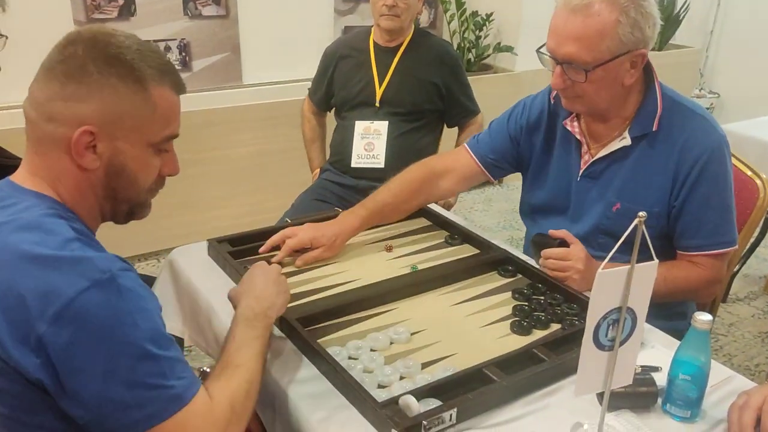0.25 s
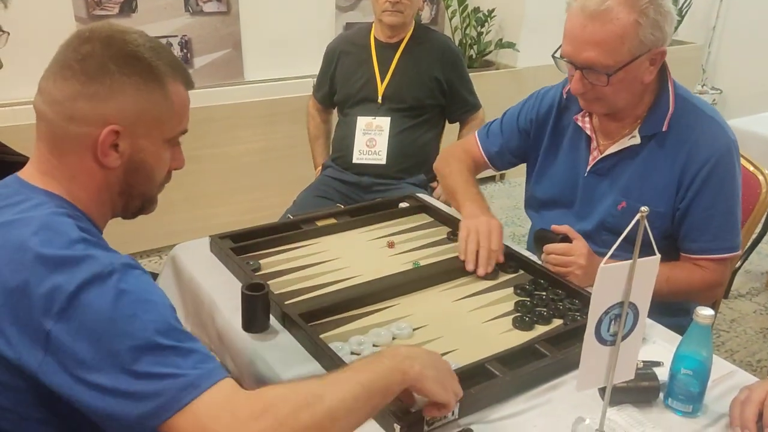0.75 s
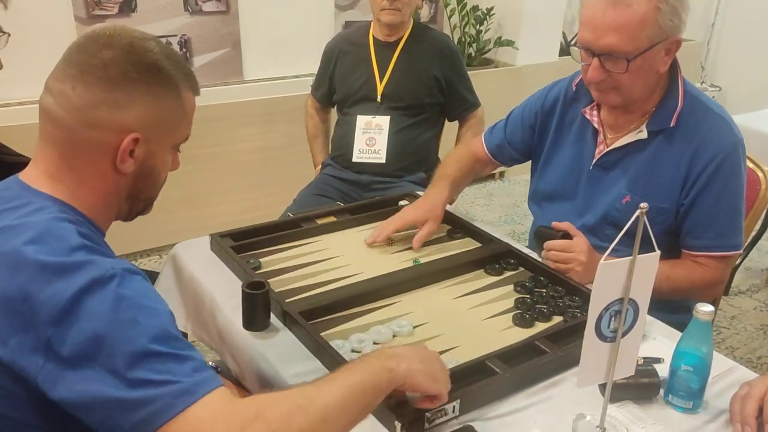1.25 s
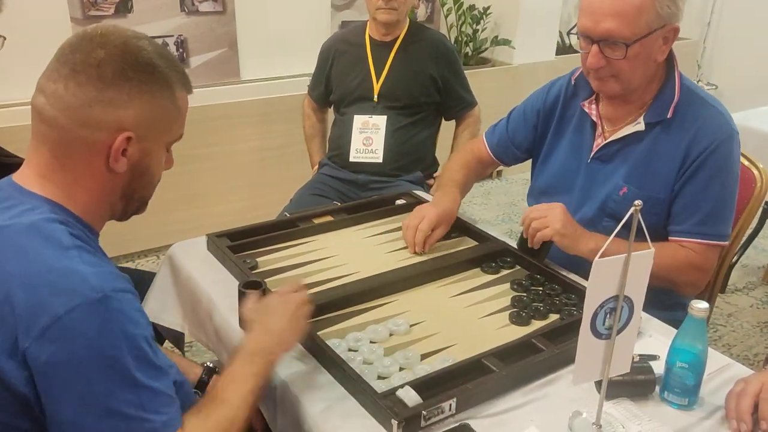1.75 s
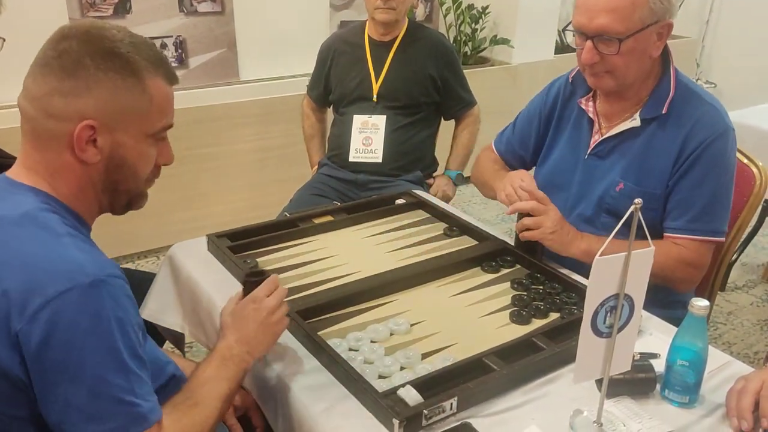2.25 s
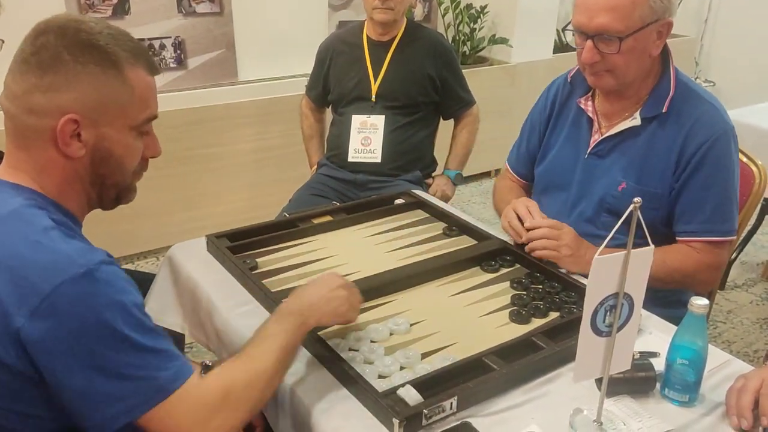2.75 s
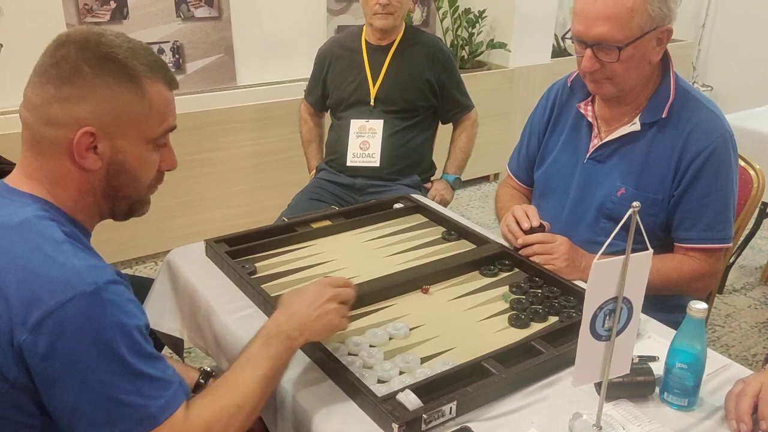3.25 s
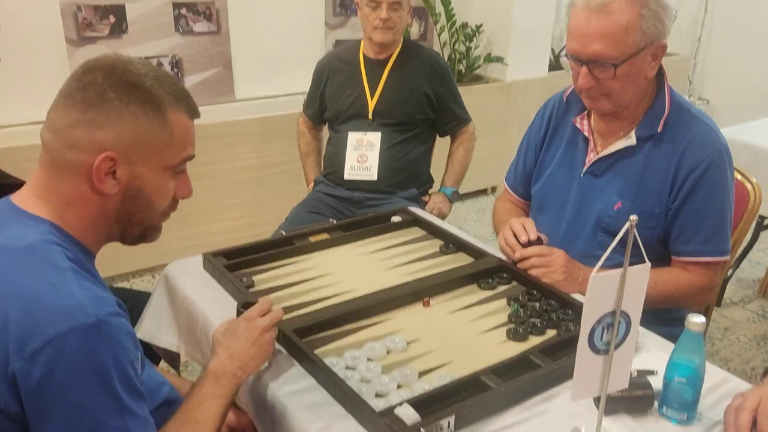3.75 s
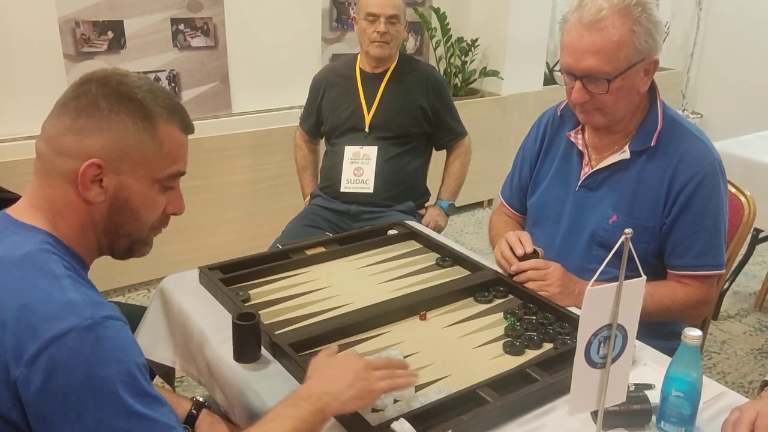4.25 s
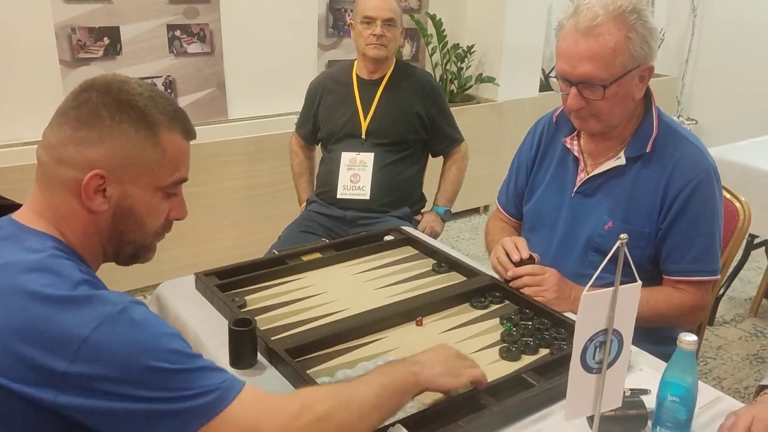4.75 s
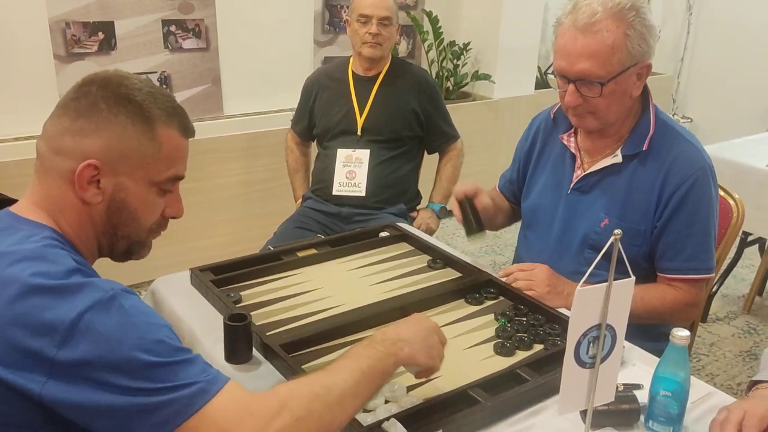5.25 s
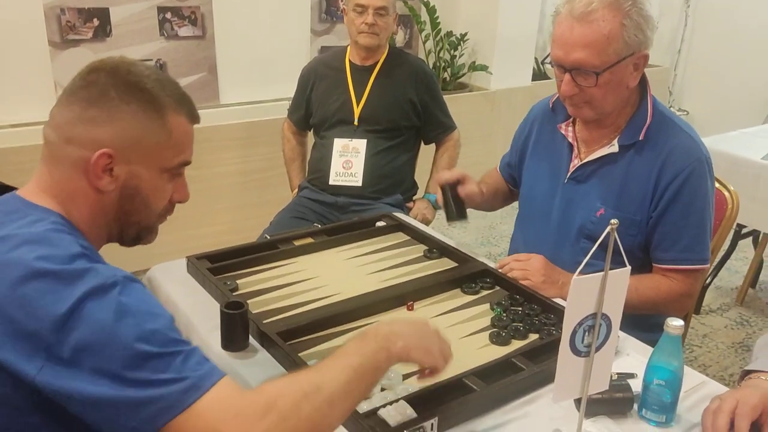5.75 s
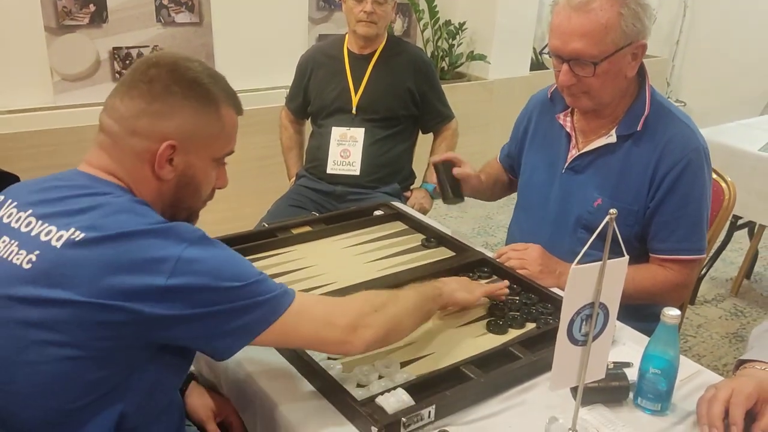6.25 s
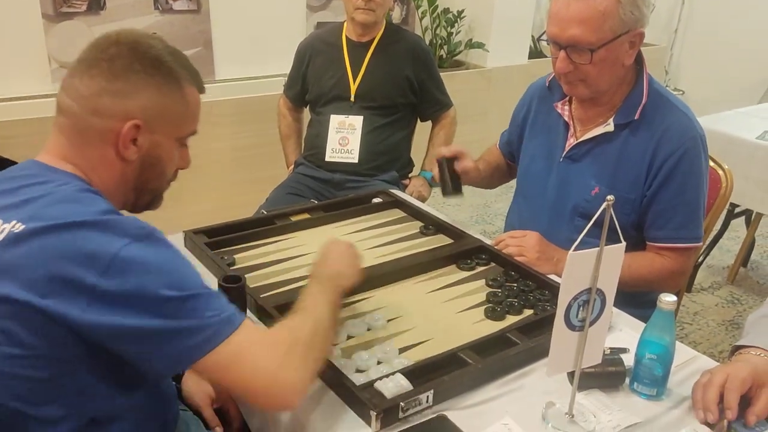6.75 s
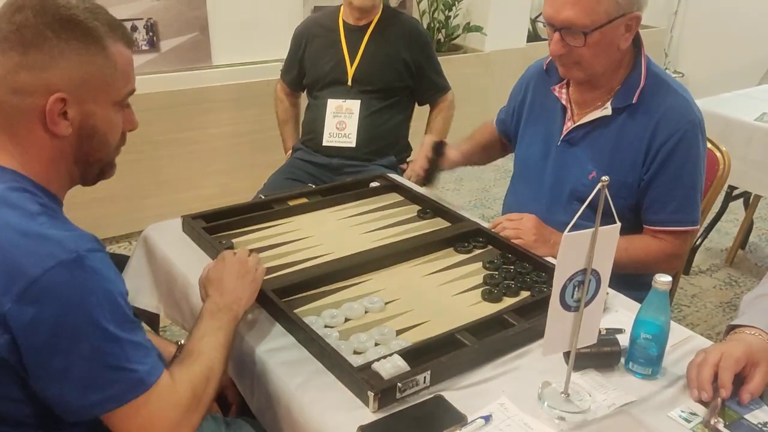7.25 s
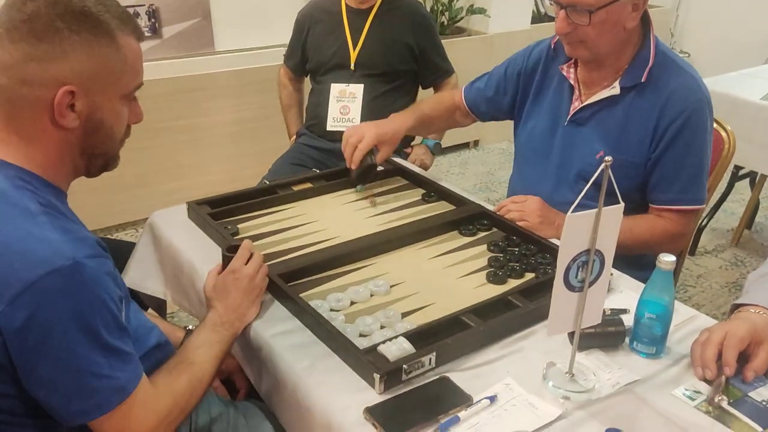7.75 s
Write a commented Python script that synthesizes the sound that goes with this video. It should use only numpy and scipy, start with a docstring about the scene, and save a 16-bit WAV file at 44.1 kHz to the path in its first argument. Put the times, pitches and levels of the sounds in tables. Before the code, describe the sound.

A quiet hall with a low mains hum and soft ventilation, heard in stereo close beside a wooden backgammon board. A very soft wood knock and faint slide open, with tiny dice ticks around 0.4-0.5 s. Checkers clack sharply at 0.9-1.0 s and again near 1.4 s. Dice knock hollowly in a cup at about 1.7 s, returning at 2.5 s with a bright tick. From 2.8 to 4.9 s it is sparse: faint slides, soft thuds and small clicks. Two crisp checker clicks come at 5.1 s, then a hard bright cluster at 5.5-5.7 s as the cup begins to rattle. Shaking is loud and dense from 5.8 to 7.1 s, deep and higher knocks overlapping. Two dry clicks sound left at 7.16 s; light dice ticks, weak cup knocks and muted board thuds trail to 8 s, with a diffuse, gentle echo behind.

```python
"""A soft knock on wood and a faint slide come first, over a low mains hum; then dice tick in a
cup that rings hollow and checkers clack: backgammon in a quiet hall, heard from beside the table.
Solid contacts are short bursts of damped modes plus a noisy crack, and the cup sounds as an air cavity.
Hands and pieces thud on the wooden board or slide with friction noise; ventilation lies beneath.
The knocks are also sent into a diffuse hall echo whose patterns fade into one another."""
import sys
import numpy as np
from scipy import signal
from scipy.fft import rfft, irfft
from scipy.io import wavfile
from scipy.ndimage import uniform_filter1d

SR = 44100
rng = np.random.default_rng(int(sys.argv[2]) if len(sys.argv) > 2 else 0)


def generate_wav(sig):
    """Save sig (samples, or channels by samples) to the path in sys.argv[1] as 16-bit PCM at SR."""
    pcm = np.round(np.clip(np.atleast_2d(sig).T, -1, 1) * 32767).astype(np.int16)
    wavfile.write(sys.argv[1], SR, pcm)


N = 352788

# Dice knocking inside a cup, with a few returns of the knock at 1.66 s; from 5.4 s two shakes
# overlap, a deep one about every .27 s and a higher one every .17 s.
# Each row: start in seconds, level in dB before the gains of each layer,
# pitch in Hz to which the cavity sinks, its t60 in seconds, wall rap in dB relative to the level.
CUP_KNOCKS = [(0.356, -39.5, 1060, 0.017, -4), (.459, -42.5, 1110, 0.021, -13),
              (.527, -49, 1090, .018, -16), (.637, -47, 1080, .016, -14), (1.664, -21, 897, .06, -1.5),
              (1.696, -33, 860, .025, -4), (1.716, -29, 940, .036, -20), (1.736, -34, 884, .028, -14),
              (1.747, -33, 844, 0.022, -18), (1.787, -34, 898, 0.035, -25), (1.82, -39, 870, .024, -15),
              (2.268, -53, 1080, 0.034, -19), (2.319, -40.5, 1080, 0.033, -2.5),
              (2.496, -22, 820, .021, -14), (2.512, -26.5, 837, .022, -18), (2.545, -25, 780, 0.024, -18),
              (2.637, -30, 772, 0.02, -15), (2.648, -41, 815, 0.024, -18), (2.738, -41, 900, 0.011, -11),
              (2.773, -41.5, 870, 0.012, -14), (5.463, -19.5, 724, 0.018, -16),
              (5.476, -18.5, 755, 0.011, -18), (5.71, -22.5, 660, 0.021, -2), (5.716, -23, 750, 0.013, -8),
              (5.73, -27, 714, 0.014, -4), (5.739, -24, 610, 0.023, -20), (5.786, -34, 720, 0.015, -12),
              (5.843, -23, 838, 0.036, -7.5), (5.862, -27, 875, .03, -17), (5.869, -26, 903, .03, -13),
              (5.922, -26.5, 817, .028, -22), (5.971, -16, 670, .019, -13), (5.976, -21, 680, 0.013, -15),
              (5.984, -25, 760, 0.013, -12), (5.993, -25, 704, 0.014, -8), (6.029, -17.5, 817, 0.028, -2),
              (6.036, -18.5, 794, 0.021, -3.5), (6.046, -19.5, 860, .02, -10), (6.061, -25, 830, .02, -10),
              (6.09, -26.5, 840, .02, -14), (6.113, -28, 840, .03, -6), (6.172, -27.5, 680, 0.02, -26),
              (6.196, -21.5, 803, 0.037, -3), (6.213, -23, 854, 0.024, -18), (6.222, -23, 840, .026, -7),
              (6.251, -21.5, 820, 0.014, -9), (6.259, -17, 694, 0.015, -18), (6.283, -30, 830, .02, -14),
              (6.32, -35, 810, .022, -13), (6.365, -22, 810, 0.018, -15), (6.372, -23.5, 940, 0.018, -19),
              (6.378, -21.5, 935, 0.018, -18), (6.39, -26.5, 853, .026, -15),
              (6.397, -25.5, 854, 0.025, -11), (6.494, -22.5, 626, 0.019, -19),
              (6.517, -21, 700, 0.017, -6), (6.521, -21, 654, 0.019, -12), (6.543, -20.5, 840, 0.015, -5),
              (6.551, -15, 824, 0.023, -5), (6.559, -23.5, 873, .018, -6), (6.567, -28, 870, .018, -11),
              (6.584, -25, 845, .017, -10), (6.625, -28, 810, 0.028, -14), (6.648, -30, 820, .02, -13),
              (6.69, -20.5, 750, .018, -14), (6.702, -18.5, 810, 0.018, -4.5), (6.711, -21, 843, 0.023, -9),
              (6.722, -22, 830, 0.029, -10.5), (6.742, -24, 830, 0.023, -15),
              (6.786, -24.5, 734, 0.023, -16), (6.791, -25, 637, 0.028, -17), (6.8, -23.5, 696, 0.013, -12),
              (6.861, -20, 845, 0.024, -14), (6.879, -22, 880, 0.024, -16), (6.888, -27, 850, 0.02, -18),
              (6.901, -23, 840, 0.025, -21), (6.911, -28, 860, 0.02, -16), (6.93, -24.5, 610, 0.021, -26),
              (6.937, -28.5, 814, .018, -18), (6.982, -27, 850, 0.023, -11.5),
              (7.02, -25.5, 866, 0.029, -12), (7.065, -17.5, 787, 0.05, -26),
              (7.087, -26.5, 780, 0.022, -14), (7.131, -29, 794, 0.037, -10), (7.305, -40, 950, .014, -5),
              (7.376, -32, 815, 0.026, -16), (7.39, -35, 830, .022, -12), (7.421, -37.5, 815, 0.025, -9),
              (7.452, -39, 804, .02, -13), (7.511, -37, 780, 0.026, -15), (7.58, -37, 794, 0.028, -17),
              (7.632, -40, 745, 0.019, -9), (7.736, -38, 800, .018, -13), (7.766, -36.5, 820, .02, -20),
              (7.789, -28.5, 820, .018, -22), (7.796, -32.5, 814, 0.016, -20),
              (7.907, -45, 850, 0.019, -10)]
# Modes of a die. Each row: frequency in Hz, relative level in dB, t60 in seconds.
DIE_MODES = [(2240, 3.5, 0.014), (3640, 2.5, 0.0062), (5070, 7.3, 0.0055), (6660, 3.2, 0.0018),
             (8090, 2, 0.015), (8760, 7.5, 0.0064), (10420, 2.5, 0.0095), (12540, 6.9, 0.013)]
# Modes of the cup wall. Each row: frequency in Hz, relative level in dB, t60 in seconds.
CUP_WALL_MODES = [(1300, -5, 0.0092), (1940, -2.5, 0.0086), (2245, -0.5, 0.0094), (2630, -6.5, 0.0054)]


def checkers(lead_db=-6.5):
    """Impact of hard discs: a burst of touches excites rim and bending modes, and chatter repeats it."""
    # Checker set against checker. Each row: start in seconds, level in dB before the common gain,
    # loss per chatter in dB, body in dB relative to the level, main body mode in Hz, its t60 in
    # seconds, wood beneath in dB and edge above 12 kHz in dB (both relative to the level),
    # leading rim mode in Hz, left-right difference in dB at the first touch.
    contacts = [(.926, -29.5, 7.5, -1, 3750, 0.014, -15, -32, 7150, 31),
                (0.9454, -34, 12, -17, 3620, .012, -25, -20, 11000, -20),
                (0.9646, -34.5, 24, 6.5, 3350, .007, -3, -34, 8400, -26),
                (.978, -25, 14, 5, 3600, .005, -11.5, -40, 10660, 20),
                (1.1897, -48, 23, -5, 2590, .02, 0, -36, 7000, 0),
                (1.3846, -32, 7, -9.5, 2200, 0.011, -9, -19, 10600, 5),
                (1.401, -43, 7, 1, 2250, .015, -10, -25, 7000, 0),
                (1.4292, -41, 12, -4, 2330, 0.013, -11, -24, 10700, 0),
                (1.445, -17.5, 24, -13, 2310, .005, -20, -25, 10500, 3),
                (3.326, -59, 6, 8.5, 3400, .006, -10, -25, 7060, -15),
                (3.373, -44, 6.5, 2.5, 3880, .0067, -18, -23, 11200, 26),
                (3.46, -42.5, 11, -4, 4260, 0.005, -24, -29, 7000, 36),
                (3.578, -49.5, 20, -5, 3900, .006, -17, -18, 11000, 8),
                (4.604, -43.5, 11, 0.5, 3830, 0.0046, -20, -33, 10500, 32),
                (5.0735, -26.5, 3, -5, 3880, .007, -19, -21, 7000, 31),
                (5.099, -23, 6, -9.5, 3940, 0.0059, -19.5, -15, 7000, 11),
                (5.4846, -21.5, 19, -18, 3960, .015, -18, 1, 8450, 14),
                (5.488, -13.5, 5, -19, 4300, .015, -30, 5, 8400, -19),
                (5.4943, -16, 8, -18, 4270, .016, -32, -3, 8500, 1),
                (5.51, -23.5, 4, -18, 3980, .015, -22, 3, 8700, 18),
                (5.519, -19.5, 17, -23, 4260, .015, -27, -12, 9540, 21),
                (5.5584, -42.5, 20, 7, 3060, 0.028, -13, -10, 8450, 8),
                (5.5925, -16.5, 17, -2.5, 4050, 0.013, -28, -33, 8340, -41),
                (5.604, -23, 18, -14, 2300, .03, -22, -30, 8700, -17),
                (5.6106, -17, 2.5, -7, 2345, .027, -23, -39, 10500, 2),
                (5.6559, -16.5, 8, -13.5, 2210, 0.022, -14.5, -19, 9150, 1.5),
                (5.9761, -26, 14, -25, 3900, .008, -30, 0, 8630, -4),
                (5.994, -27, 0, -10.5, 4260, .01, -26, -3, 8400, 3)]
    # Each row: frequency in Hz, relative level in dB, t60 in seconds.
    rim_modes = [(5840, -2, .012), (6980, 2, 0.019), (7740, 0, 0.0063), (8560, -2.5, .018),
                 (9680, 1, 0.011), (10670, 6, 0.013), (11430, 9.5, .0078), (12200, -1, .022),
                 (12750, -3, .02)]
    chatter_s = 0.0056  # a checker rocks against its neighbour this often
    swing = -0.9  # share of left-right bias kept; negative: successive touches alternate left and right
    # two hard faces meet in tiny touches about this far apart, each a little softer
    touch_s, touch_loss_db = .0009, 1.5
    out = np.zeros((2, N))
    for (start, first_db, loss_db, body_db, body_hz, body_t60,
         wood_db, edge_db, rim_hz, pan_db) in contacts:
        for s, db in bounces(start, first_db, chatter_s, loss_db, count=4):
            rim = ring(rim_modes, crack_s=.0007, crack_db=4.0, length_s=.06, spread=0.019)
            rim = touches(rim, touch_s, touch_loss_db, count=3)
            lead = ring([(rim_hz, 0, .011)], crack_s=0.00098, crack_db=-10.0, length_s=.06, spread=0.0073)
            bend = ring([(body_hz, 0, body_t60)], crack_s=0.00094, crack_db=7.0, length_s=.06, spread=0.046)
            bend = touches(bend, touch_s, touch_loss_db, count=2)
            clack = part(rim + amp(lead_db) * lead, 5850, 10800, head_s=0.0047)
            clack += amp(edge_db) * part(rim, 12270, 13000, head_s=.0037)
            clack += amp(body_db) * part(bend, 2040, 5550, head_s=0.0045)
            clack += amp(wood_db) * rap(len(rim), 930, 2570, head_s=0.0032)
            add(out, s, amp(db) * clack, pan_db, lag_ms=.1)
            pan_db = swing * pan_db
    return amp(0.5) * out


def dice():
    """Small stiff cubes have high, heavily damped modes: short bright ticks, each with a softer twin."""
    # Die on die. Each row: start in seconds, level in dB, body near 3 kHz in dB relative to the
    # level, left-right difference in dB.
    contacts = [(0.46, -34, -13.5, 6), (.471, -36, -19, 2), (0.4818, -42.5, -17, -7),
                (0.5006, -40, -17, -3), (.51, -40, -19, 2), (0.771, -41, -10.5, -13),
                (1.6927, -36.5, -12, 0), (1.96, -44.5, -46, 10.5), (2.2021, -41.5, -12.5, 8),
                (2.267, -37.5, -15, 4), (2.348, -38, -15, 4), (2.4997, -27, -15.5, 4.5),
                (2.6024, -41.5, -22, 2), (5.4645, -47, -18, 6), (5.851, -43.5, -22, 0),
                (5.939, -36.5, -30, 2), (5.947, -39, -25, 0), (6.15, -40, -10, 0), (6.158, -34.5, -10, -3),
                (6.1722, -30.5, -18, 27), (6.2078, -22.5, -24, 1.5), (6.3, -35.5, -25, 5),
                (6.3701, -40, -7, 2), (6.3778, -38, -14, 4), (6.48, -41, -14, 3), (6.494, -36, -16, 4),
                (6.5928, -24, -10.5, 4), (6.7108, -32, -25, 3), (6.8016, -35, -11, 0), (6.809, -35, -22, 2),
                (6.814, -38, -22, 0), (6.88, -34.5, -7, -1), (6.888, -34.5, -16, 2), (7.01, -36, -21, -4),
                (7.018, -38, -18, 2), (7.061, -38.5, -22, 0), (7.0767, -23.5, -12.5, 3.5),
                (7.327, -31.5, -13.5, -2), (7.335, -33, -14, 2), (7.418, -32.5, -19, 8),
                (7.478, -41, -10.5, 6)]
    rebound_s, loss_db, edge_db = 0.017, 26.5, -29  # edge above 12 kHz, relative to the level
    out = np.zeros((2, N))
    for start, first_db, body_db, pan_db in contacts:
        for s, db in bounces(start, first_db, rebound_s, loss_db, count=2):
            tick = ring(DIE_MODES, crack_s=.0006, crack_db=0., length_s=.015, spread=.04)
            add(out, s, amp(db) * click(tick, body_db, edge_db), pan_db, lag_ms=.28)
    return out


def cup(scuff_db=-11.0, second_die_s=.0025, second_die_db=4.5):
    """Cavity resonance: two dice rap the wall and sound the air, retuned and damped as the hand covers it."""
    sag, sag_s = 0.016, 0.022  # the cavity starts sharp by this share and sinks to its pitch
    rise_s = 0.00028  # time for its air to get moving
    # second resonance: ratio to the cavity pitch, relative level, t60 in seconds
    upper_ratio, upper_db, upper_t60 = 1.34, -16.5, 0.015
    out = np.zeros((2, N))
    t = np.arange(SR // 8) / SR
    for s, db, hz, t60, wall_db in CUP_KNOCKS:
        turns = np.cumsum(hz * (1 + sag * np.exp(-t / sag_s))) / SR
        lower = np.exp(-np.log(1000) * t / t60) * np.sin(2 * np.pi * turns)
        upper = np.sin(2 * np.pi * (upper_ratio * turns + rng.random()))
        upper *= amp(upper_db) * np.exp(-np.log(1000) * t / upper_t60)
        cavity = rng.choice([-1, 1]) * (1 - np.exp(-t / rise_s)) * (lower + upper)
        scuff = rng.standard_normal(len(t)) * np.exp(-t / 0.0035)
        scuff = part(scuff, hz * 0.762, hz * 1.19, head_s=.00094, order=2)
        wall = ring(CUP_WALL_MODES, crack_s=0.0031, crack_db=5.0, length_s=.03, spread=0.064)
        wall = touches(wall, second_die_s, second_die_db, count=2)
        wall = part(wall, 1470, 2770, head_s=0.00078, order=3)
        add(out, s, amp(db + 2.5) * (cavity + amp(scuff_db) * scuff), pan_db=.5, lag_ms=.2)
        add(out, s, amp(db + wall_db) * wall, pan_db=-4.5, lag_ms=0.34)
    # so small a cup radiates no bass
    return signal.sosfilt(signal.butter(4, 580, "high", fs=SR, output="sos"), out)


def tumbling(count=4, below_db=-23.0, tick_db=-30.0):
    """Secondary impacts: after a knock the dice skitter along the cup wall and tick against each other."""
    out = np.zeros((2, N))
    for s, db, hz, t60, wall_db in CUP_KNOCKS:
        waits = rng.uniform(0.0048, .045, (2, count))  # seconds
        for tap_wait, tick_wait, size in zip(*waits, rng.standard_normal(count)):
            tap = ring(CUP_WALL_MODES, crack_s=0.0011, crack_db=18.0, length_s=.01, spread=0.19)
            tap = part(tap, 1600, 7200, head_s=0.0056, order=2)
            tick = ring(DIE_MODES, crack_s=0.0005, crack_db=6.0, length_s=.01, spread=0.073)
            tick = part(tick, 4800, 11000, head_s=0.001, order=2)
            tap_gain = amp(db + wall_db / 2 + below_db + 3.7 * size)
            add(out, s + tap_wait, tap_gain * tap, pan_db=4.0, lag_ms=0.29)
            add(out, s + tick_wait, amp(db + tick_db + 3.8 * size) * tick, pan_db=6.0, lag_ms=0.29)
    return out


def board():
    """Plate modes of the wooden case: hands, cup and checkers land and settle with thud, knock and rap."""
    # Blows on the board. Each row: start in seconds, level in dB, loss to the settling touch in dB,
    # nominal pitch of the thud in Hz, panel near 700 Hz and hard rap near 1.6 kHz, both in dB
    # relative to the level.
    blows = [(0.012, -56.5, 10, 280, 5, -8), (0.312, -63, 19, 250, -2, -2),
             (0.357, -51.5, 26, 300, -10, -21), (.461, -59.5, 20, 290, -8, -12),
             (0.654, -56, 23, 149, -10, -19), (0.767, -54.5, 4, 170, -2, -10),
             (0.803, -51, -2, 358, 5, -29), (0.833, -51, 34, 268, 6, 14.5),
             (1.051, -56.5, 5, 318, 5.5, -34), (1.166, -60.5, 5, 290, 0, -14),
             (1.345, -50.5, 10, 132, -10, -8.5), (1.808, -52.5, 16, 115, -15, -6),
             (2.499, -46.5, 12, 274, -14, -2), (2.976, -59, -3, 312, 2.5, -18),
             (3.338, -58.5, 1, 375, 6.5, -17), (3.884, -54.5, 29, 278, -26, -39),
             (4.548, -59.5, 6, 310, 2, -16), (4.632, -50.5, 5, 457, 6.5, -31),
             (5.099, -58.5, 26, 157, -8, 7), (5.333, -57.5, 0, 390, 10, -5),
             (5.489, -44.5, 9, 387, -31, -3), (6.216, -51.5, 0.5, 264, -10, 6),
             (7.055, -41, 22, 258, -19, -22), (7.204, -44.5, 7, 330, -1, -15),
             (7.287, -48, 4.5, 278, -3, -16), (7.47, -56.5, 3, 327, 5, -23),
             (7.746, -45.5, 14, 318, 0, -19), (7.96, -59, 12, 300, -1, -18)]
    # Each row: frequency in Hz, relative level in dB, t60 in seconds.
    case_modes = [(102.2, 1, 0.15), (194.3, -3.5, 0.11), (257.2, -1.5, .1), (343.7, 7.5, 0.044),
                  (426, 2.5, 0.068), (592, 2.5, 0.04), (653, -6, 0.056), (930, -15.5, 0.0088)]
    settle_s = .047  # hand or piece comes to rest about this long after a blow
    thuds, raps = np.zeros((2, 2, N))
    for start, first_db, loss_db, hz, panel_db, rap_db in blows:
        for s, db in bounces(start, first_db, settle_s, loss_db, count=2):
            wood = ring(case_modes, crack_s=0.015, crack_db=4.5, length_s=0.25, spread=0.088)
            case = part(wood, hz * 0.55, hz * 1.286, head_s=0.046, order=2)
            panel = part(wood, 439, 883, head_s=0.022, order=3)
            hard = rap(len(wood), 610, 2150, head_s=0.037)
            add(thuds, s, amp(db) * (case + amp(panel_db) * panel), pan_db=0.5, lag_ms=0.13)
            add(raps, s, amp(db + rap_db) * hard, pan_db=-1.0, lag_ms=0.091)
    return thuds, raps


def taps():
    """Contact noise dominates the modes: two dull, dry clicks on the left, close to the microphone."""
    # Each row: start in seconds, level in dB.
    dry_clicks = [(7.1609, -30), (7.1662, -32)]
    out = np.zeros((2, N))
    for s, db in dry_clicks:
        tap = ring(DIE_MODES, crack_s=0.0011, crack_db=22.0, length_s=0.014, spread=0.054)
        tap = part(tap, 3200, 8300, head_s=0.0052, order=1)
        add(out, s, amp(db) * tap, pan_db=16.0, lag_ms=0.04)
    return out


def sliding(grain_db=2.5):
    """Stick-slip friction: fine hiss catches and slips every few milliseconds as a slide swells and dies."""
    # Sleeves and pieces sliding over the board, dice sliding in the cup.
    # Each row: start in seconds, length in seconds, level in dB while it holds.
    slides = [(0.125, 0.53, -56), (0.622, 0.11, -51), (0.753, 0.18, -55), (1.31, 0.2, -48),
              (1.652, 0.15, -49), (1.758, 0.34, -55), (2.338, 0.068, -47.5), (2.842, 0.13, -56),
              (3.03, 0.22, -71), (3.326, 0.18, -79), (4.353, 0.4, -78), (4.785, 0.12, -59),
              (5.825, 0.082, -48), (6.205, .18, -45.5), (6.537, 0.24, -42.5), (7.035, 0.091, -46),
              (7.267, 0.91, -62.5)]
    rise, fall = 0.3, 0.49  # shares of a slide spent gathering speed and slowing down
    hiss_spectrum = [(600, -30), (2500, -18.0), (4500, -14.0), (7000, -10.5),
                     (9000, -2.0), (10700, -8.0), (12500, -10.5), (14500, -33)]
    hiss = noise(hiss_spectrum, [(1000, 0.17), (9000, 0.059)])
    grain = evened(uniform_filter1d(rng.standard_normal(N), size=150))
    speed = np.full(N, amp(-66))  # clothes rustle between the slides
    for start, length, db in slides:
        done = (np.arange(N) / SR - start) / length
        speed += amp(db) * np.clip(np.minimum(done / rise, (1 - done) / fall), 0, 1)
    return hiss * speed * amp(grain_db * grain)


def background():
    """Stationary noise and tones: ventilation, and a mains hum whose phase wavers slightly."""
    # The hall's ventilation. Each row: frequency in Hz, relative spectral level in dB.
    air = [(15, -1.5), (28, 4), (62, -11.5), (120, -13), (160, -20), (300, -17), (400, -21.5),
           (1000, -30.5), (2100, -29), (4100, -34.5), (8500, -32.5), (13700, -34.5), (14800, -45)]
    # Mains hum. Each row: frequency in Hz, rms level in dB.
    hum_tones = [(49.3, -57), (100, -67), (194, -78), (291, -74.5)]
    t = np.arange(N) / SR
    waver = noise([(.5, 8), (3, -23), (8, -77), (20, -120)], [(1, 0.89)])[0]
    hum = np.zeros(N)
    for hz, db in hum_tones:
        phase = 2 * np.pi * (hz * t + rng.random()) + 1.4 * waver
        hum += amp(db) * np.sqrt(2) * np.sin(phase)
    return hum + amp(-55.0) * noise(air, [(40, 0.11), (250, 0.55), (700, 0.15), (2000, 0.032)])


def hall(x, count=3):
    """Time-varying reverberation: three different echo patterns fade into one another in turn."""
    turn = np.arange(N) / SR * 1.7  # 1.7 rounds through the echoes per second
    weights = np.cos(np.pi * (turn + np.arange(count)[:, None] / count)) ** 2
    weights /= np.linalg.norm(weights, axis=0)
    return sum(signal.oaconvolve(x * w, echo(), axes=1)[:, :N] for w in weights)


def echo(early_db=-3.5):
    """Impulse response: early reflections within 26 ms, and a diffuse tail with decay set by frequency."""
    # Each row: frequency in Hz, t60 in seconds, level of the tail in dB before the hall sends.
    decay_bands = [(121, 1, 2), (290, 1, -1.5), (895, 0.65, 0.5), (1920, 0.46, 1), (4630, 0.34, -4),
                   (8200, 0.42, -5), (13200, 0.2, 2.5)]
    hz, t60, db = np.transpose(decay_bands)
    # one random spike in every 12 samples, from 5 ms on
    spikes = np.zeros((2, SR * 3 // 4))
    at = np.arange(220, spikes.shape[1] - 12, 12)
    at = at + rng.integers(0, 12, (2, len(at)))
    np.put_along_axis(spikes, at, rng.choice([-1., 1.], at.shape), 1)
    f, t, z = signal.stft(spikes, SR, nperseg=256)
    same = np.clip(0.96 * np.sinc(f / 1400), -1, 1)[:, None]  # long waves reach both microphones alike
    z[1] = same * z[0] + np.sqrt(1 - same ** 2) * z[1]
    decay = amp(-60 * t / read(np.c_[hz, t60], f)[:, None])
    energy = np.mean(decay ** 2, 1, keepdims=True) * at.shape[1]
    decay *= amp(read(np.c_[hz, db], f))[:, None] / np.sqrt(energy)
    tail = signal.istft(z * decay, SR, nperseg=256)[1]
    delays = rng.uniform(.0015, .026, size=24)  # seconds; the later ones from wall or ceiling
    for s in delays:
        reflection = np.array([amp(early_db) * rng.choice([-1, 1]) / np.sqrt(len(delays))])
        add(tail, s, reflection, pan_db=-2, lag_ms=rng.uniform(-.35, 0.49))
    return tail


def ring(modes, crack_s, crack_db, length_s, spread):
    """Modal synthesis of a blow: a few clear modes, plus a crack of countless heavily damped ones."""
    t = np.arange(int(length_s * SR)) / SR
    hz, db, t60 = np.transpose(modes)
    detune, strength, phase = rng.standard_normal((3, len(hz)))  # every blow lands on another spot
    struck_hz = hz * (1 + spread * detune)
    vibration = np.sin(2 * np.pi * (np.outer(struck_hz, t) + phase[:, None]))
    clear = amp(db + 2 * strength) @ (vibration * amp(-60 * t / t60[:, None]))
    crack = np.exp(-t / crack_s) * rng.standard_normal(len(t))
    return evened(clear) + amp(crack_db) * evened(crack)


def click(sound, body_db, edge_db, foot_db=-5.5):
    """Mode excitation: a flat blow brings out the low body, a blow on the rim the highest ring."""
    # fingers and board stop the slow bending first
    damped = sound * np.exp(-np.arange(len(sound)) / SR / 0.013)
    foot = part(damped, 660, 1970, head_s=0.004, order=2)  # the wood under the piece
    body = part(damped, 1950, 5300, head_s=0.0049)
    bright = part(sound, 6060, 10130, head_s=0.0052, order=3)
    edge = part(sound, 12000, 12600, head_s=0.0037)
    return amp(body_db) * (amp(foot_db) * foot + body) + bright + amp(edge_db) * edge


def rap(size, lo_hz, hi_hz, head_s, crunch_db=-18.5, crunch_s=0.0014):
    """Impulsive force: something hard meets wood in one sharp push with a brief crunch, without modes."""
    crunch = amp(crunch_db) * rng.standard_normal(size) * np.exp(-np.arange(size) / SR / crunch_s)
    return part(signal.unit_impulse(size) + crunch, lo_hz, hi_hz, head_s, order=2)


def touches(sound, gap_s, loss_db, count):
    """Micro-impacts: a contact repeats in quick, uneven succession, scaled by the burst's total energy."""
    waits = np.r_[0, np.cumsum(gap_s * rng.uniform(.5, 1.5, count - 1))]
    sizes = amp(-loss_db * np.arange(count)) * rng.choice([-1, 1], count)
    burst = np.zeros(len(sound))
    for wait, size in zip(waits, sizes):
        burst += size * np.pad(sound, (int(wait * SR), 0))[:len(sound)]
    return burst / np.linalg.norm(sizes)


def bounces(s, db, gap_s, loss_db, count):
    """Rebound: a contact and its repeats as (s, dB), nearly evenly spaced, each loss_db below the last."""
    uneven = .1  # share by which the wait between two bounces varies
    waits = gap_s * (1 + uneven * rng.uniform(-1, 1, count))
    return zip(s + np.cumsum(waits) - waits[0], db - loss_db * np.arange(count))


def part(sound, lo_hz, hi_hz, head_s, order=3):
    """Band-pass filtering: one register of a blow, with the energy of head_s seconds at rms 1."""
    band = signal.lfilter(*signal.butter(order, [lo_hz, min(hi_hz, SR / 2.2)], "band", fs=SR), sound)
    return band * np.sqrt(head_s * SR / np.sum(band ** 2))


def noise(spectrum, likeness):
    """Spectral shaping: two channels of noise coloured by (Hz, dB), correlated by (Hz, 0-1)."""
    hz = np.fft.rfftfreq(N, 1 / SR)
    left, other = rfft(rng.standard_normal((2, N)))
    same = np.clip(read(likeness, hz), 0, 1)
    right = same * left + np.sqrt(1 - same ** 2) * other
    return evened(irfft(np.array([left, right]) * amp(read(spectrum, hz)), N))


def add(mix, s, sound, pan_db, lag_ms):
    """Stereo localisation: level and arrival differ; a positive lag reaches the right microphone later."""
    sides = np.array([1, -1])  # left, right
    for out, side, gain in zip(mix, sides, evened(amp(sides * pan_db / 2))):
        first = max(round((s - side * lag_ms / 2000) * SR), 0)
        place = out[first:][:len(sound)]
        place += gain * sound[:len(place)]


def amp(db):
    """Logarithmic level: decibels to gain."""
    return 10 ** (np.asarray(db) / 20)


def evened(x):
    """Mean-square normalisation: scales to rms 1."""
    return x / np.sqrt(np.mean(x ** 2) + 1e-20)


def read(points, hz):
    """Logarithmic frequency scale: joins (Hz, value) points by straight lines on it."""
    f, value = np.transpose(points)
    return np.interp(np.log(hz + 1), np.log(f + 1), value)


def scene():
    """Superposition: the knocks sound direct and in one hall; taps, slides and background stay dry."""
    clacks = checkers()
    ticks = dice()
    knocks = cup() + tumbling()
    thuds, raps = board()
    sent = amp(-2.5) * clacks + amp(0.5) * ticks + amp(-1.5) * knocks + amp(2) * thuds + amp(-3.0) * raps
    wet = hall(sent)
    return clacks + ticks + knocks + thuds + raps + wet + taps() + sliding() + background()


def record(dry):
    """Transducer response: the right side dips near 12.5 kHz, loud peaks are rounded, then the band limit."""
    edge_hz = 14300
    dull = amp(read([(11000, 0.0), (12500, -21), (15000, 16.0)], np.fft.rfftfreq(N, 1 / SR)))
    pair = np.array([dry[0], irfft(rfft(dry[1]) * dull, N)])
    rounded = 1.1 * np.tanh(pair / 1.1)
    low_pass = signal.firwin(127, edge_hz, window=("kaiser", 8), fs=SR)
    return signal.oaconvolve(rounded, low_pass[None], "same")


dry = scene()
out = record(dry)
generate_wav(out)
```